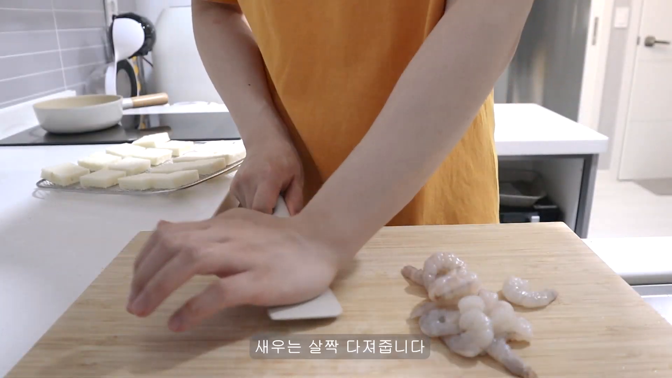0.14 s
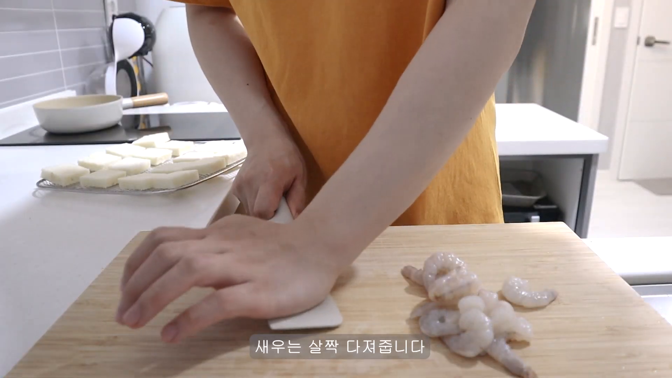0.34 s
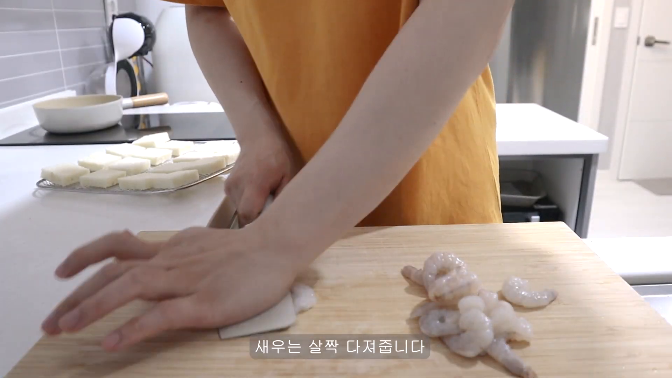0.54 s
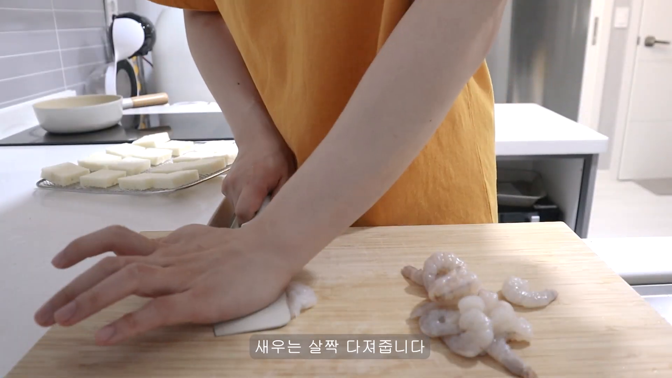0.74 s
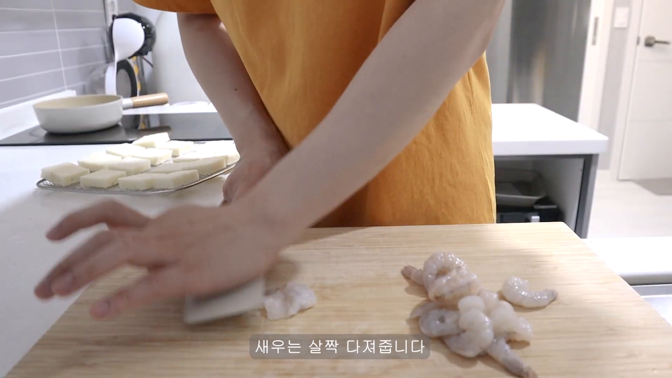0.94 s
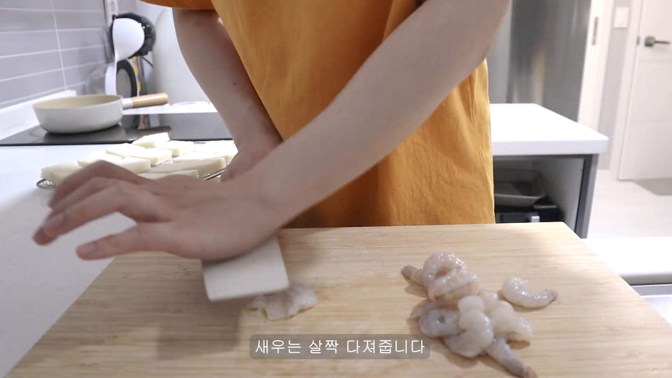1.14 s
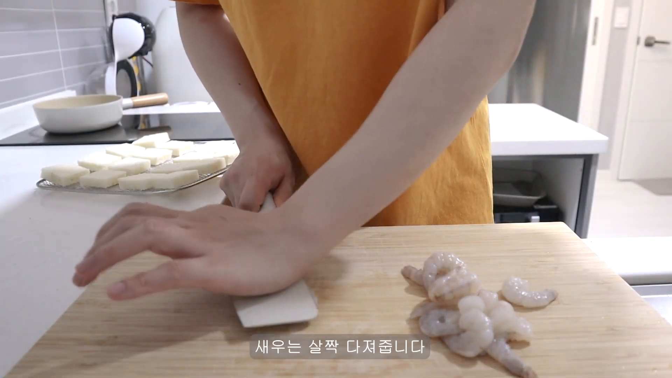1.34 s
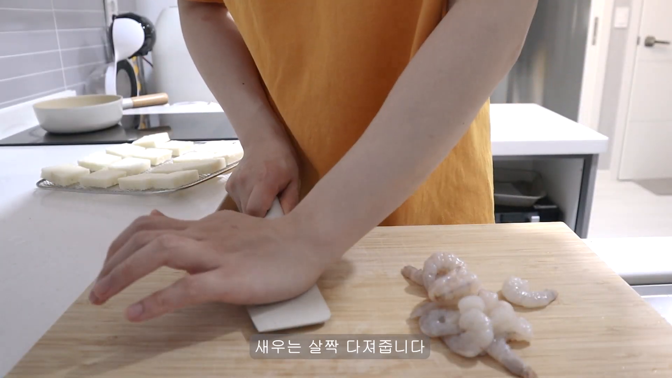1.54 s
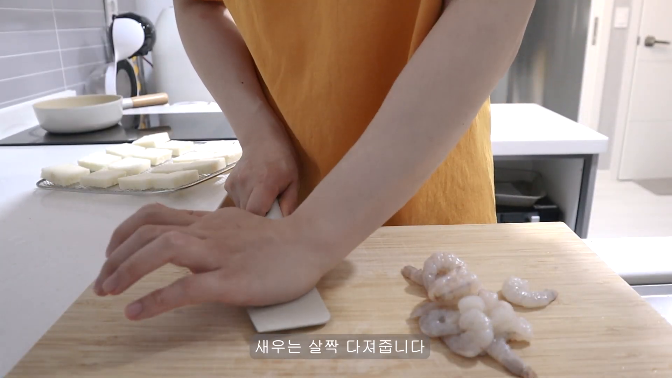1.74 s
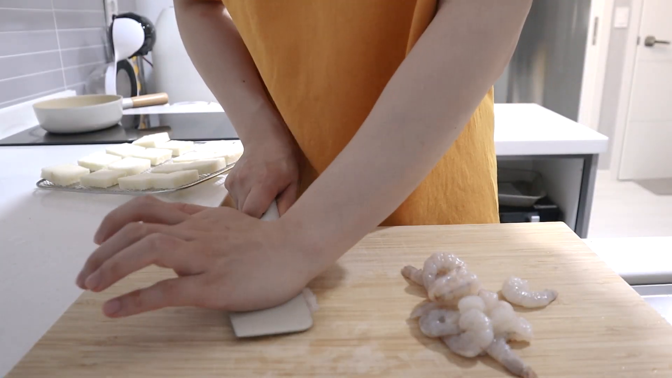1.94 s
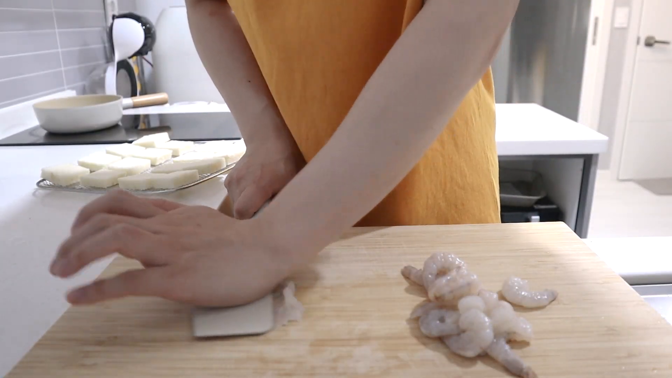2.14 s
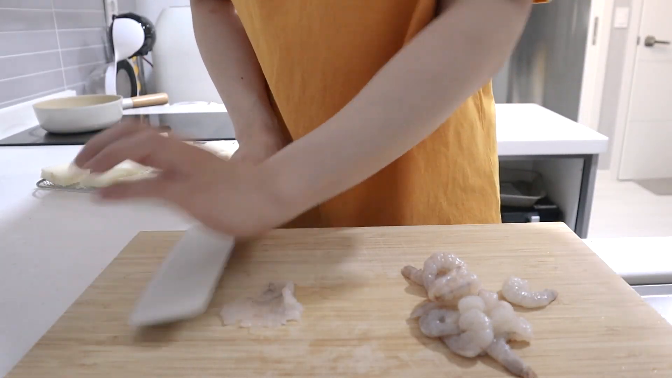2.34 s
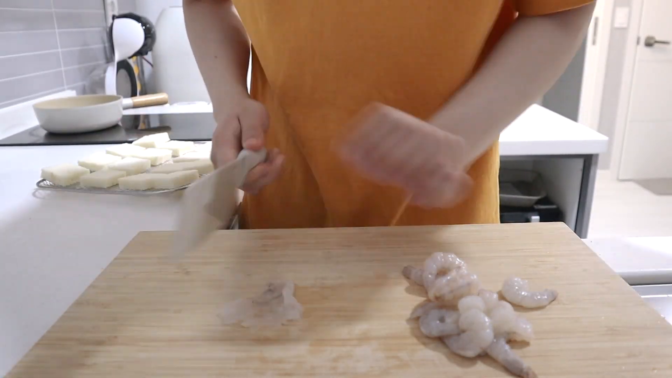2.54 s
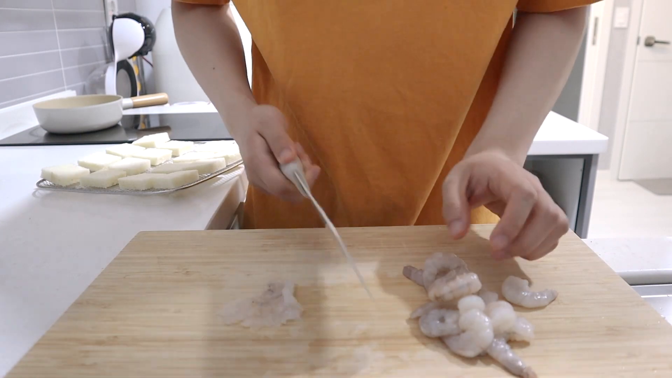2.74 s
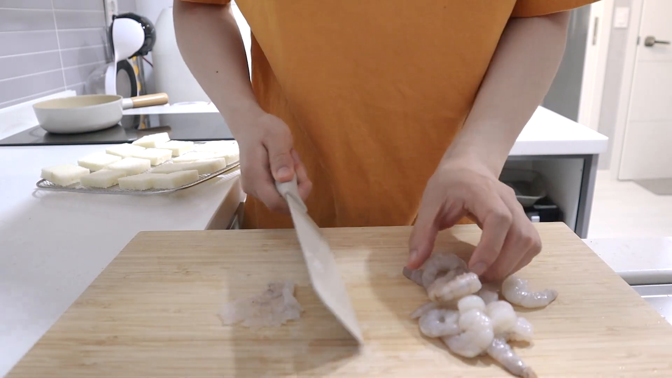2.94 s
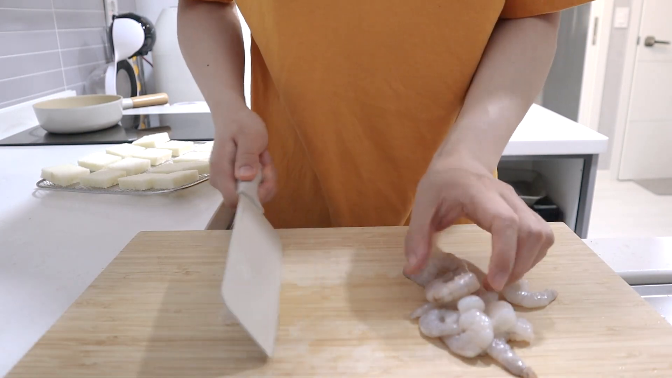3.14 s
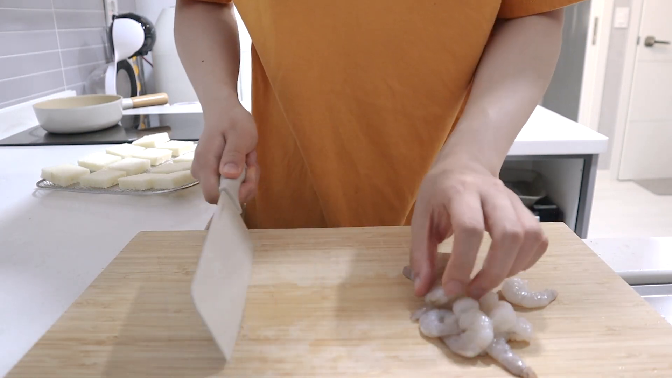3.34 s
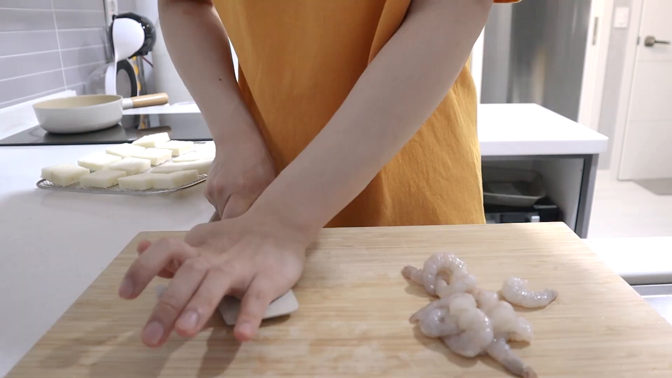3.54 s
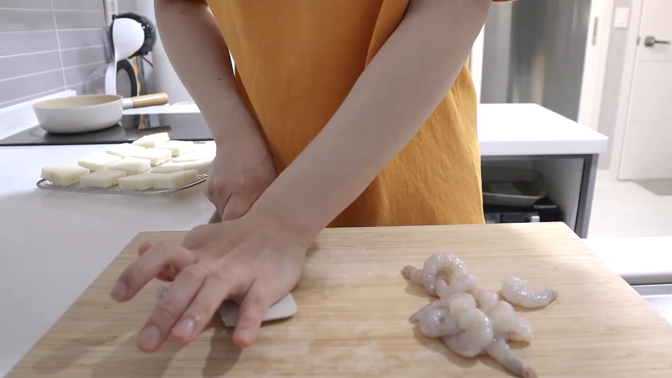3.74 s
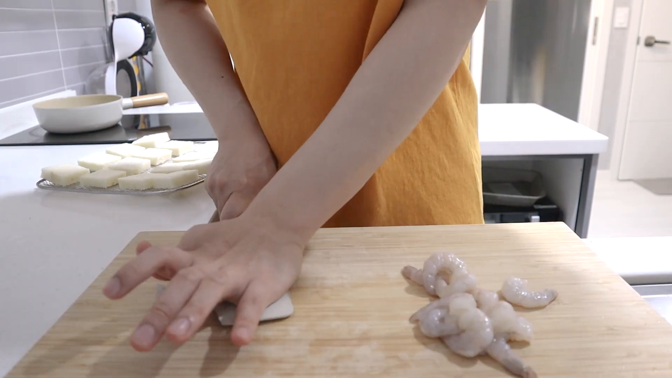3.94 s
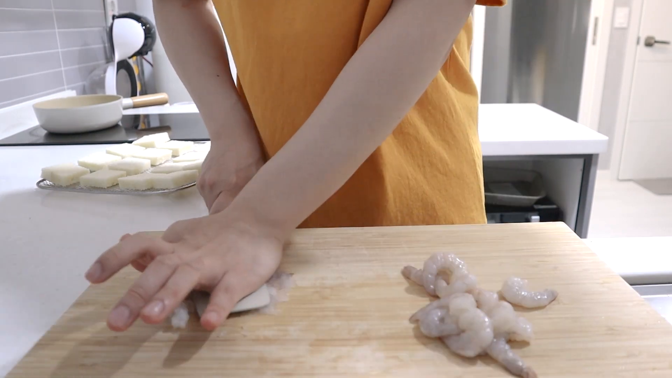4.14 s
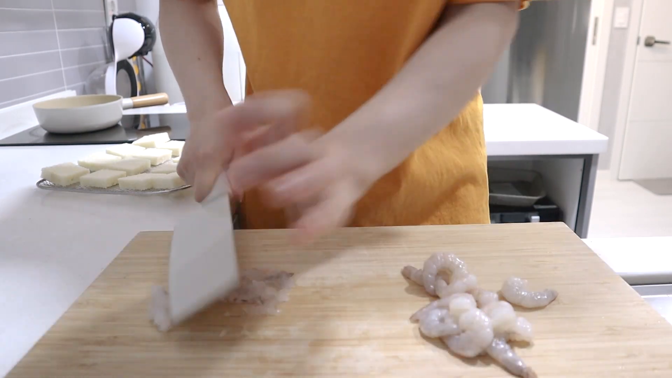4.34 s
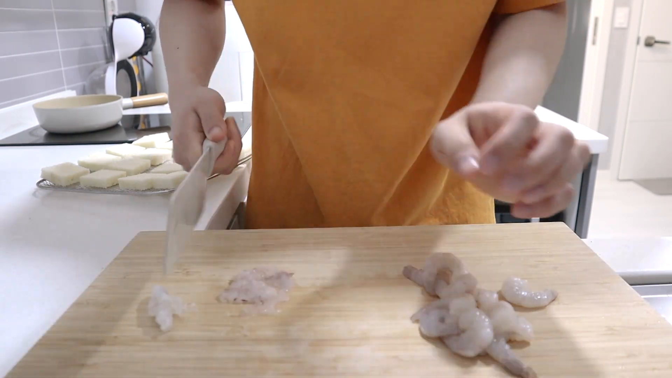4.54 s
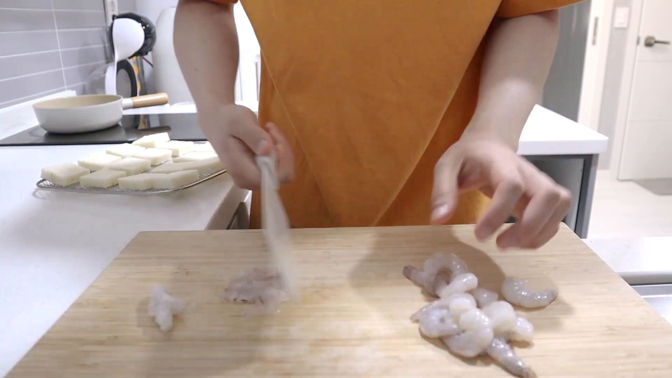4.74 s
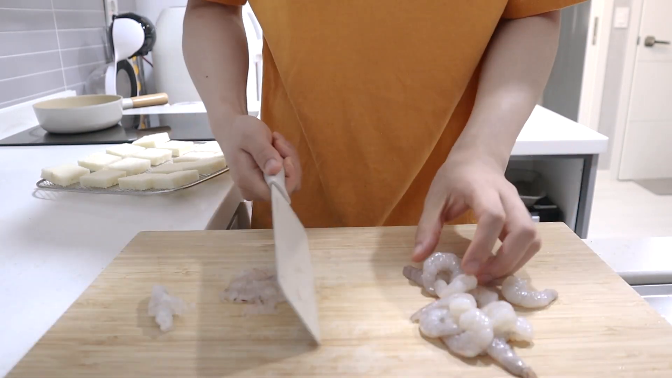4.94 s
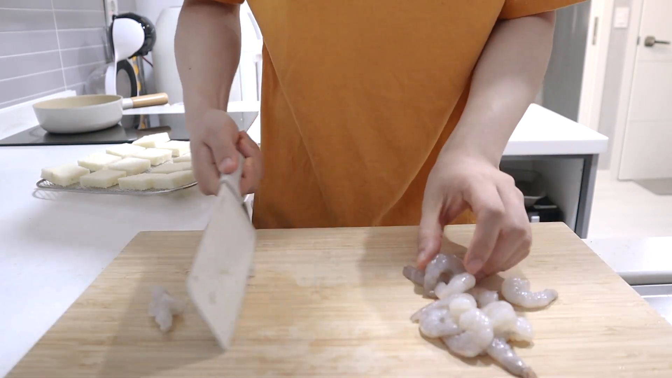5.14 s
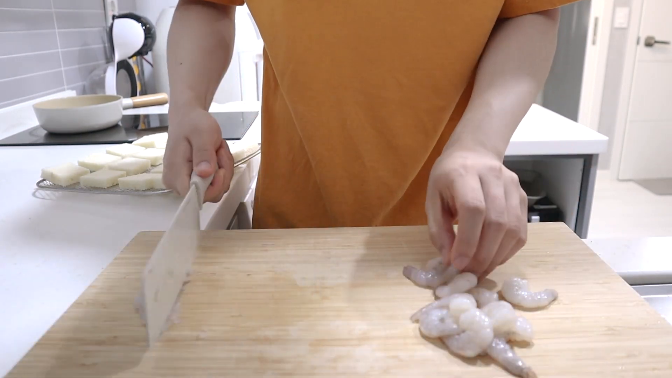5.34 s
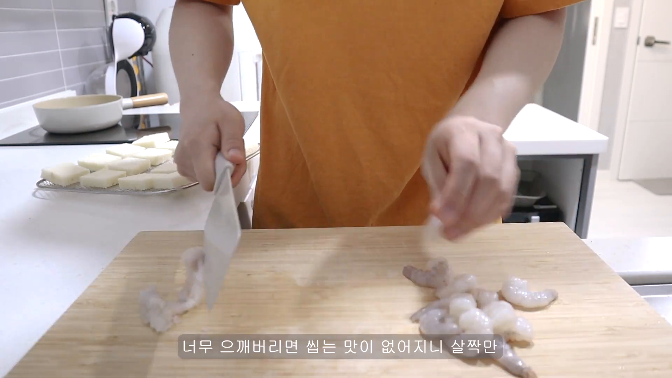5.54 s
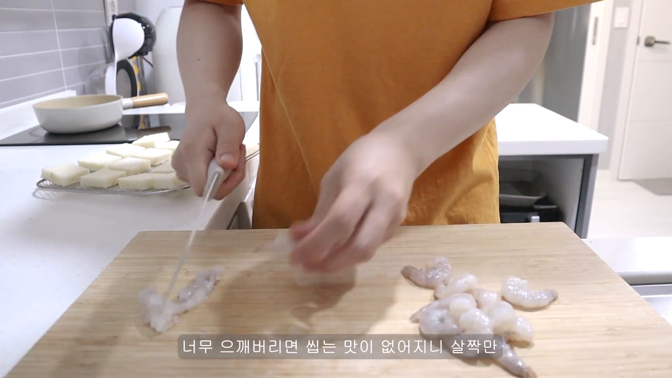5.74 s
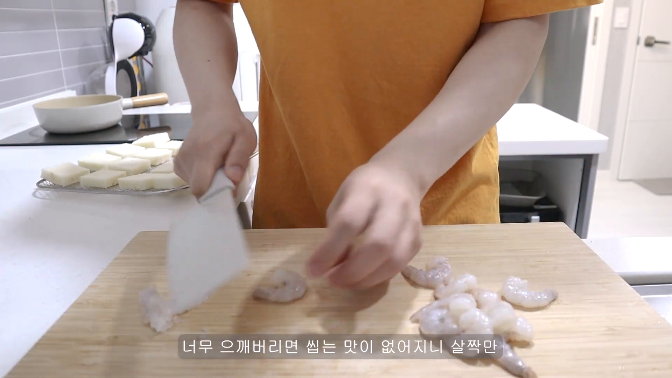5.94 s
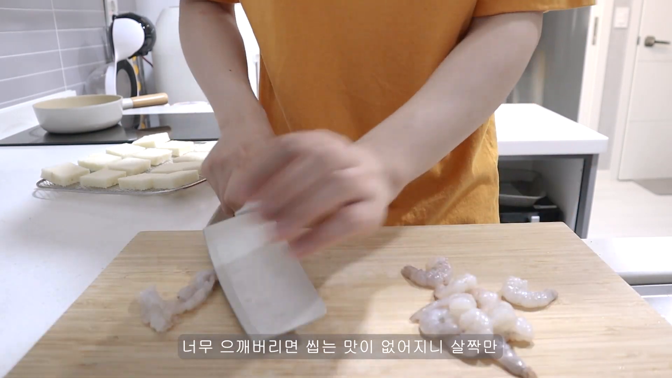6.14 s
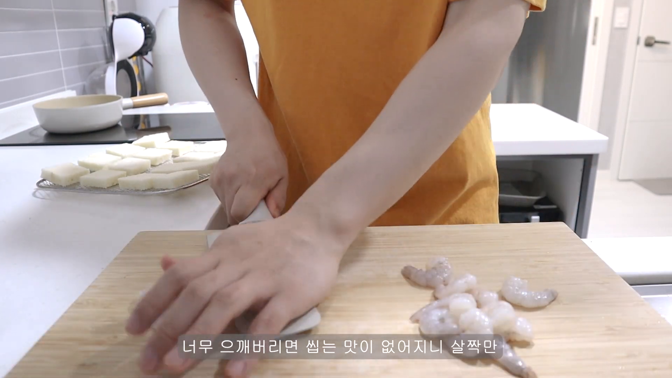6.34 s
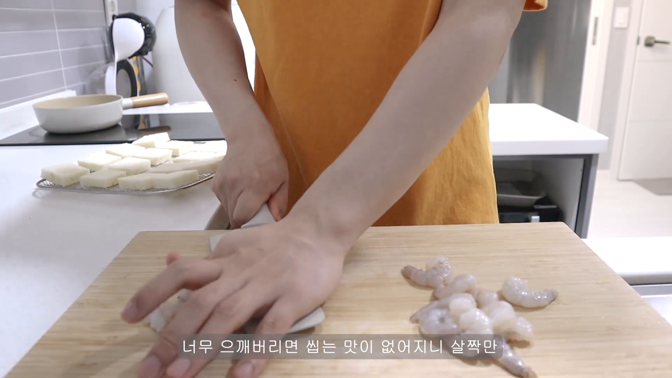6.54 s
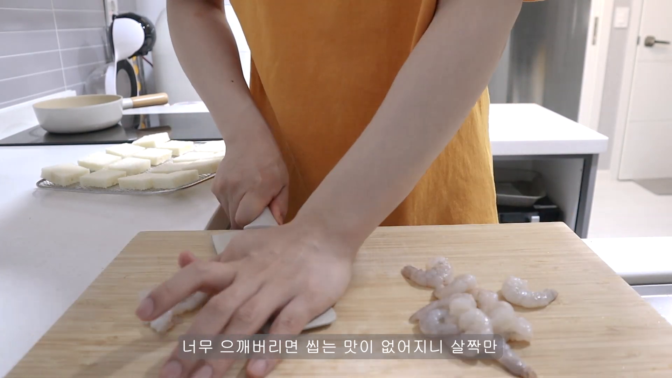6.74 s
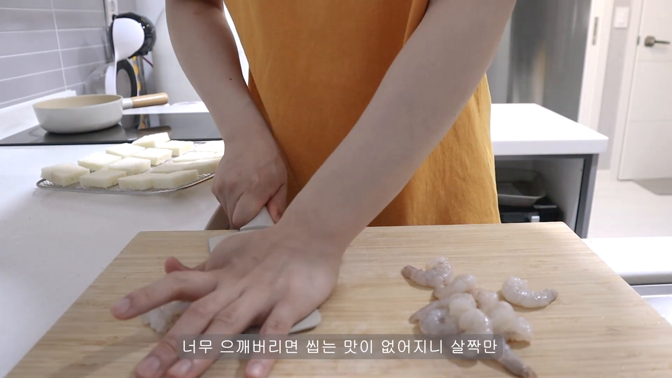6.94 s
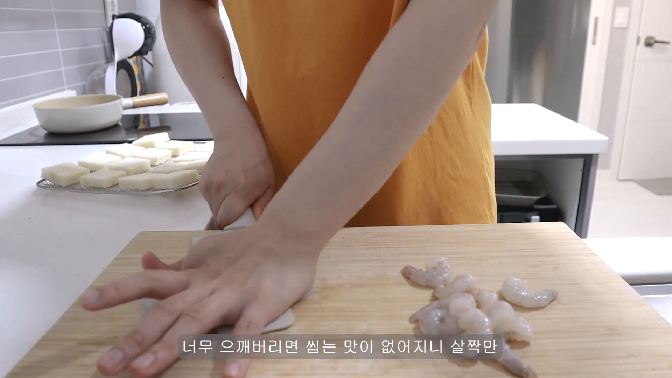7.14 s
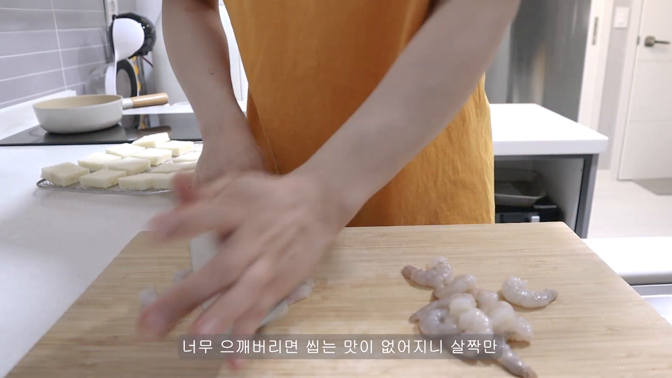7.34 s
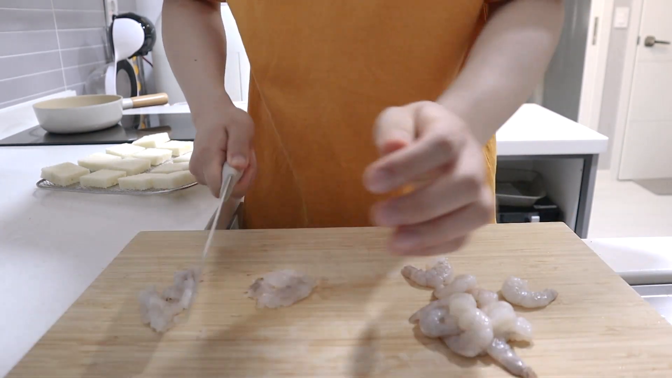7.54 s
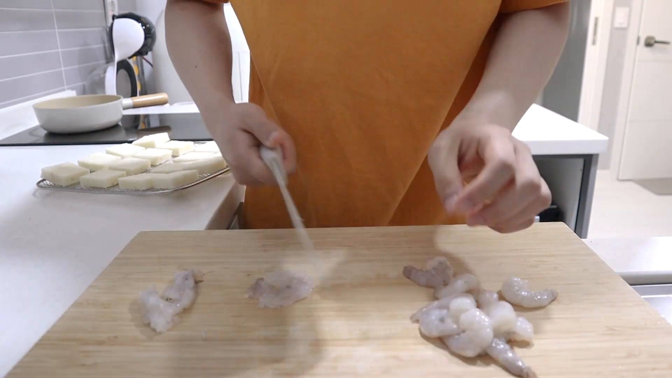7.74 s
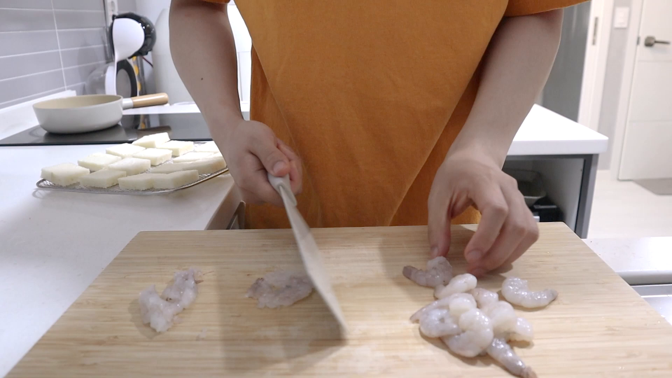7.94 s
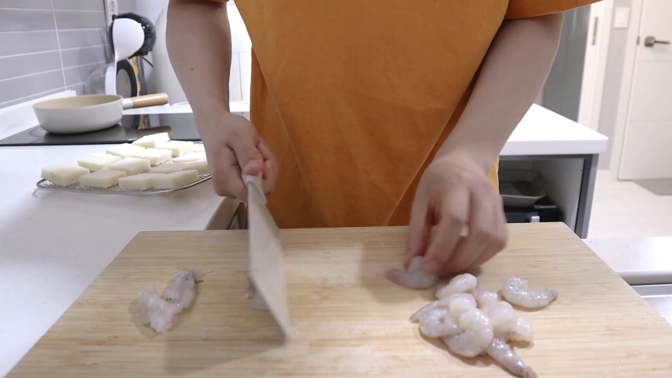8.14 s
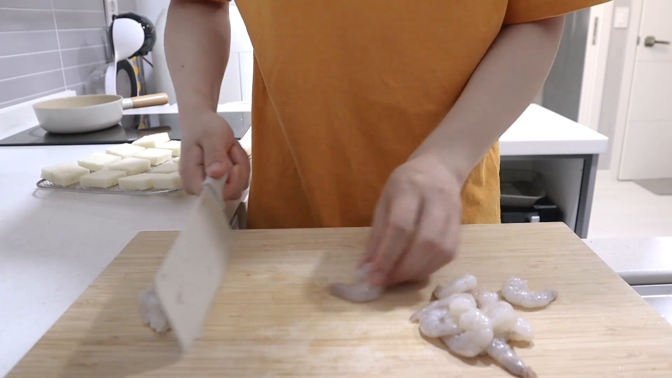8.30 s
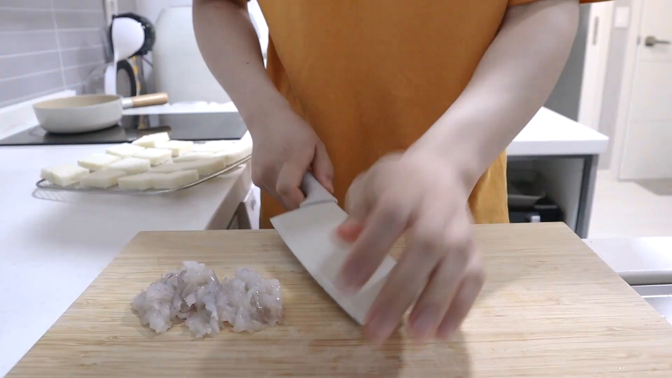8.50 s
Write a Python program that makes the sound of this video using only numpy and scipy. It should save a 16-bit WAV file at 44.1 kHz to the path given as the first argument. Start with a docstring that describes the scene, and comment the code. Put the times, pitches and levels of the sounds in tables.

```python
"""A steel cleaver, knocked down by a palm, crushes raw shrimp on a bamboo board in a small kitchen. Each knock
rings the board, and hard slaps also ring the blade; the crushed flesh squelches, fizzes and pops. Three times
the edge is scraped across the wood: a rain of tiny slips, coloured by blade and board. At 8.4 s all sound of
the work stops at once, in the middle of the last scrape; only the low hum of the room and one soft bump follow."""
import sys
import numpy as np
from scipy import signal
from scipy.fft import rfft, irfft, next_fast_len
from scipy.io import wavfile
from scipy.ndimage import uniform_filter1d

SR = 44100
rng = np.random.default_rng(int(sys.argv[2]) if len(sys.argv) > 2 else 0)


def dump(signal):
    """Clip the signal to [-1, 1] and save it as 16-bit WAV at the path in sys.argv[1]."""
    limited = np.clip(np.atleast_2d(signal).T, -1, 1)
    pcm = np.round(limited * 32767).astype(np.int16)
    wavfile.write(sys.argv[1], SR, pcm)


N = 382347
TIME = np.arange(N) / SR


def from_db(db):
    """Turn decibels into gain."""
    return 10 ** (np.asarray(db) / 20)


def at_hz(points, hz):
    """Read a table between its rows, on a log-frequency axis."""
    points = np.array(points)
    return np.interp(np.log(np.maximum(hz, 1)), np.log(points[:, 0]), points[:, 1])


def unit(x):
    """Scale a mid/side pair so that the mid has rms 1."""
    return x / np.sqrt(np.mean(x[0] ** 2) + 1e-20)


def band(x, low_hz, high_hz):
    """Keep only the sound between two frequencies."""
    sos = signal.butter(3, [low_hz, min(high_hz, 0.45 * SR)], "band", fs=SR, output="sos")
    return signal.sosfilt(sos, x)


def colour(x, spectrum, width, peaks=(), between_db=0, shared=0.26):
    """Give a mid/side pair a spectrum and a width; resonances stand out of the spectrum."""
    size = next_fast_len(x.shape[1])
    hz = np.arange(size // 2 + 1) * SR / size
    power = from_db(at_hz(spectrum, hz) + between_db) ** 2
    for centre, wide, db in peaks:
        wide = max(wide, centre / 130)
        power = power + from_db(db) ** 2 / (1 + ((hz - centre) / wide) ** 2) ** 2
    mid, side = rfft(x, size)
    # the shared part of the side lags the mid by about a quarter turn, wavering with frequency
    knots = np.linspace(0, SR / 2, 60)
    lag = np.interp(hz, knots, rng.normal(-np.pi / 2, 0.3, len(knots)))
    side = np.sqrt(shared) * np.exp(1j * lag) * mid + np.sqrt(1 - shared) * side
    side = side * from_db(at_hz(width, hz))
    coloured = irfft(np.array([mid, side]) * np.sqrt(power), size)
    return unit(coloured[:, :x.shape[1]])


def grains(per_s, spread_db):
    """Make random tiny slips of uneven size, as mid and side."""
    born = rng.random(N) < per_s / SR
    size_db = spread_db * np.minimum(rng.exponential(1, N), 4)
    return born * from_db(size_db) * rng.standard_normal((2, N))


def wander(x, depth_db, wide_hz, hold_s):
    """As the point of contact travels, resonances swell and fade at random."""
    hz, s, cells = signal.stft(x, SR, nperseg=512)
    field = rng.standard_normal(cells.shape[1:])
    for _ in range(2):
        field = uniform_filter1d(field, max(1, round(wide_hz / hz[1])), axis=0)
        field = uniform_filter1d(field, max(1, round(hold_s / s[1])), axis=1)
    moved = signal.istft(cells * from_db(depth_db * field / field.std()), SR)[1]
    return unit(moved[:, :N])


def fade(t, t60):
    """Die away exponentially, by 60 dB in t60 seconds."""
    return from_db(-60 * t / t60)


def add(out, start_s, sound):
    """Mix a sound in at its time."""
    i = int(start_s * SR)
    out[:, i:i + sound.shape[1]] += sound[:, :N - i]


# Tone of the still air. Each row: frequency in Hz, relative level in dB per Hz.
AIR = [(15, -57), (25, -9.5), (53, -2.5), (81, -6), (118, -1.5), (146, -14.5), (293, -16), (373, -15.5),
       (415, -18), (450, -19.5), (1390, -25.5), (4500, -34), (6370, -40.5), (12800, -46), (15000, -78.5)]
# Stereo width of the air. Each row: frequency in Hz, side over mid in dB.
AIR_WIDTH = [(60, -41.5), (180, -5.5), (550, 4), (1650, 4.5), (4970, 6), (15000, 6.5)]
# Steady hums of the room. Each row: frequency in Hz, width in Hz, level in dB.
HUM = [(118.5, 3.8, -74.5), (272.2, 9.7, -86), (355, 10, -89), (2685, 160, -87.5)]


def room_tone(air_db=-68.5):
    """Still air is rumbling noise; narrow bands of noise make the appliance hums."""
    air = from_db(air_db) * colour(rng.standard_normal((2, N)), AIR, AIR_WIDTH, shared=0)
    for hz, wide, db in HUM:
        noise = rng.standard_normal((2, N + SR))
        hum = unit(band(noise, hz - wide / 2, hz + wide / 2)[:, SR:])   # skip the filter's slow start
        air = air + from_db(db) * hum * from_db([[0], [at_hz(AIR_WIDTH, hz)]])
    return air


# How long the kitchen rings. Each row: frequency in Hz, time to fall by 60 dB in seconds.
ROOM_T60 = [(100, 0.65), (500, 0.43), (2000, 0.4), (6000, 0.33), (14000, 0.4)]


def kitchen(x, wet_db=-10.0, build_s=0.0015):
    """Tiles and cupboards return a short, diffuse tail whose bass lasts longest."""
    t, edges, tail = TIME[:SR // 2], np.geomspace(50, 16000, 9), 0
    for low, high in zip(edges, edges[1:]):
        noise = band(rng.standard_normal((2, len(t))), low, high)
        tail = tail + noise * fade(t, at_hz(ROOM_T60, np.sqrt(low * high)))
    tail = tail * (1 - np.exp(-(t / build_s) ** 2))
    tail = tail / np.sqrt(np.sum(tail[0] ** 2))
    return x + from_db(wet_db) * signal.fftconvolve(x, tail, axes=1)[:, :N]


# Soft pushes that rock the board. Each row: start in seconds, pitch in Hz, peak in dB, rise in seconds.
BUMPS = [(0.163, 197, -39, 0.013), (.984, 113, -40.5, 0.015), (1.682, 205, -54, 0.026),
         (6.755, 194, -48.5, 0.0094), (6.283, 58, -43.5, 0.018), (8.622, 86.5, -45, 0.0113)]


def bumps():
    """The weight of a hand rocks the board on the counter: a few slow swings, alike in both ears."""
    out, t = np.zeros((2, N)), TIME[:SR // 4]
    for s, hz, peak_db, rise_s in BUMPS:
        envelope = (t / rise_s) ** 2 * np.exp(2 - 2 * t / rise_s)
        swing = envelope * np.sin(2 * np.pi * hz * t)
        add(out, s, from_db(peak_db) * np.array([swing, 0 * swing]))
    return out


def catches(depth_db, slow_hz, fast_hz):
    """Make the gain of a contact that catches and lets go many times a second."""
    return from_db(depth_db * unit(band(rng.standard_normal((1, N)), slow_hz, fast_hz)))


# The edge dragged over the wood, one list of rows for each stroke.
# Each row: time in seconds, force as relative level of the rasp in dB, brightness in dB.
STROKES = [
    [(2.99, -68, -11), (3.04, -45, -14), (3.115, -39.5, -3), (3.19, -41.5, -3.5), (3.26, -66.5, -19),
     (3.33, -51, 2.5), (3.39, -53.5, -7.5), (3.515, -56, -1.5), (3.56, -87, 6)],
    [(4.98, -60.5, -30), (5.02, -48, -7), (5.1, -39.5, -7), (5.145, -52, -1.5), (5.19, -62, -19),
     (5.24, -80, 3)],
    [(7.95, -55, -29), (8.02, -45.5, -8), (8.095, -39, -8), (8.155, -51, -8), (8.19, -46, -10),
     (8.345, -43, -1.5), (8.39, -42.5, -3.5)],
]


def stroke_controls(edge_s):
    """Follow force and brightness of the strokes, and a gate that is open while the edge touches the wood."""
    times, forces, brights = np.vstack(STROKES).T
    force, bright = np.interp(TIME, times, forces), np.interp(TIME, times, brights)
    touching = 0
    for rows in STROKES:
        outside_s = np.maximum(rows[0][0] - TIME, TIME - rows[-1][0])
        touching = touching + np.clip(1 - outside_s / edge_s, 0, 1)
    return force, bright, touching


# Tone of rubbing on the board. Each row: frequency in Hz, relative level in dB per Hz.
SCRAPE_COLOUR = [(59, -35), (100, 0.5), (180, 2.5), (291, -3), (452, -1), (703, -11), (867, -4.5),
                 (1370, -4.5), (1530, -7.5), (3390, -16.5), (5480, -25.5), (7050, -28.5), (10500, -32.5),
                 (11400, -27.5), (15000, -55)]
# Stereo width of rubbing sounds. Each row: frequency in Hz, side over mid in dB.
RUB_WIDTH = [(60, -30), (150, -24), (380, -12.5), (950, -2.5), (2380, 2), (5980, 5.5), (15000, 5)]
# Resonances of the blade pressed on the board.
# Each row: frequency in Hz, width in Hz (widened if very narrow), relative level in dB.
BLADE = [(177, 9.2, 6), (482, 52, 1.5), (1100, 24, -9), (1368, 16, 3.5), (1630, 25, 1), (2054, 52, -9),
         (2330, 29, -8.5), (2693, 31, -4.5), (3000, 44, -7.5), (3258, 52, -6.5), (3830, 20, -9),
         (4220, 160, -19), (4540, 71, -15), (4760, 13, -14), (5970, 250, -22), (6350, 66, -20),
         (6920, 150, -16), (7340, 82, -17), (9000, 38, -17.5), (8670, 67, -33.5), (9800, 23, -15),
         (11050, 82, -13.5), (12370, 33, -21), (12930, 45, -21.5)]


def scrapes(rumble_db=-7.5, rasp_db=-1.5, rumble_follows=0.92, rumble_thins=0.15, usual_force_db=-45):
    """The edge catches on the grain thousands of times a second; a bright stroke rumbles less."""
    slips = colour(grains(per_s=5000, spread_db=0.6), SCRAPE_COLOUR, RUB_WIDTH, BLADE, between_db=0.5)
    slips = wander(slips, depth_db=2.5, wide_hz=260, hold_s=0.05)
    slips = slips * catches(depth_db=0.5, slow_hz=29.0, fast_hz=204)
    low, middle, high = (unit(band(slips, *edges)) for edges in [(120, 650), (650, 2200), (2200, 16000)])
    force, bright, touching = stroke_controls(edge_s=0.011)
    rumble = usual_force_db + rumble_follows * (force - usual_force_db) - rumble_thins * bright
    rub = from_db(rumble_db + rumble) * low
    rub = rub + from_db(rasp_db + force) * middle
    rub = rub + from_db(force + bright) * high
    return touching * rub


# The loaded blade groans briefly at one pitch.
# Each row: start in seconds, length in seconds, first pitch in Hz, last pitch in Hz, level in dB.
JUDDERS = [(2.925, 0.062, 961, 863, -55), (3.1, 0.11, 180, 153, -64), (4.936, 0.081, 951, 897, -46),
           (5.077, 0.053, 1359, 1339, -46.5), (5.07, 0.12, 197.2, 150.4, -55), (7.956, 0.05, 926, 845, -45),
           (7.998, 0.089, 365.7, 483, -44), (8.379, 0.038, 1597, 1740, -47)]


def judders(wobble=0.024, rough=0.4):
    """For a moment the slips lock to one resonance, whose pitch slides with the pressure."""
    out = np.zeros((2, N))
    for s, length, first_hz, last_hz, db in JUDDERS:
        n = int(length * SR)
        pitch_waver, level_waver = unit(band(rng.standard_normal((2, SR // 2)), 20, 150))[:, -n:]
        pitch_hz = np.linspace(first_hz, last_hz, n) * (1 + wobble * pitch_waver)
        phase = 2 * np.pi * np.cumsum(pitch_hz) / SR
        tone = np.array([np.sin(phase), -from_db(at_hz(RUB_WIDTH, first_hz)) * np.cos(phase)])
        envelope = signal.windows.tukey(n, 0.5) * (1 + rough * level_waver)
        add(out, s, from_db(db) * np.sqrt(2) * envelope * tone)
    return out


def swell(start_s, length_s, peak_share=0.3, arch=0.76):
    """A push of the hand builds up and lets go in one arch; a lower arch number makes it rounder."""
    peak_s = start_s + length_s * peak_share
    angle = np.interp(TIME, [start_s, peak_s, start_s + length_s], [0, np.pi / 2, 0])
    return np.sin(angle) ** arch


# The palm bears down and flesh spreads under the blade.
# Each row: start in seconds, length in seconds, relative level in dB, weight as extra rumble in dB.
PRESSES = [(0.159, 0.096, -62.5, 4), (0.301, 0.15, -59, 8.5), (0.476, 0.22, -61, 9.5), (.94, 0.094, -75, 6),
           (1.832, 0.34, -63.5, 8.5), (2.16, 0.17, -69.5, -2), (3.532, 0.45, -68.5, 5),
           (3.995, 0.19, -69.5, 1.5), (4.18, 0.26, -75.5, 4), (5.841, 0.17, -77, 9.5),
           (6.692, .23, -60.5, 8), (6.964, 0.15, -64.5, 2.5), (7.101, 0.11, -60.5, 2),
           (7.284, 0.12, -68, 4.5)]
# The blade glides on the wet film. Each row: start in seconds, length in seconds, fizz level in dB.
GLIDES = [(.94, 0.27, -73.5), (1.207, .21, -75.5), (2.29, 0.074, -82), (4.17, 0.27, -80), (5.29, .1, -78.5)]


def squelches(rumble_db=-6.5, usual_fizz_db=-81.5, usual_press_db=-63, fizz_follows=0.79):
    """Crushed flesh gives way in wet crackles; the film of juice fizzes as the steel slides over it."""
    tears = grains(per_s=560, spread_db=1.7) + from_db(-11.0) * grains(per_s=6000, spread_db=1.5)
    crackle = wander(colour(tears, SCRAPE_COLOUR, RUB_WIDTH), depth_db=3.0, wide_hz=450, hold_s=0.02)
    film = colour(grains(per_s=12000, spread_db=-1.5), SCRAPE_COLOUR, RUB_WIDTH)
    squelch = rumble = fizz = 0
    for s, length, db, weight_db in PRESSES:
        push = swell(s, length)
        squelch = squelch + from_db(db) * push
        rumble = rumble + from_db(rumble_db + db + weight_db) * push
        # the fizz follows only part of the strength of the press
        fizz = fizz + from_db(usual_fizz_db + fizz_follows * (db - usual_press_db)) * push
    for s, length, db in GLIDES:
        fizz = fizz + from_db(db) * swell(s, length)
    return (rumble * unit(band(crackle, 90, 520))
            + squelch * unit(band(crackle, 1010, 7000))
            + fizz * unit(band(film, 7000, 14000)))


def small_pops(count, strongest_db=0.5, range_db=16.5, bright_db=1):
    """Every press bursts a few more pockets at chance moments, listed like the rows of POPS."""
    rows = []
    for s, length, press_db, _ in PRESSES:
        for _ in range(count):
            pop_db = press_db + strongest_db - range_db * rng.random()
            rows.append((s + length * rng.beta(2, 2), pop_db, bright_db))
    return rows


# The clearest wet pops of bursting and unsticking flesh.
# Each row: start in seconds, relative level in dB, brightness in dB.
POPS = [(.322, -77.5, 19), (.341, -69, -20), (.383, -72, 4), (.492, -61, -4), (.532, -72, -11),
        (.674, -55.5, -4), (.932, -72, -1), (.957, -68, 8.5), (1.628, -72, 10), (1.709, -68, 5.5),
        (1.828, -61.5, -12), (1.844, -58, -8.5), (1.888, -57.5, -6.5), (1.92, -55.5, -6),
        (1.958, -60, -1.5), (2.08, -67, 7.5), (2.178, -77, 6.5), (2.347, -80.5, 19.5), (2.359, -79, 19.5),
        (2.682, -72.5, 1.5), (3.597, -66, -4), (3.629, -59, 1), (3.67, -65, -2), (3.693, -63, -1),
        (3.794, -61.5, -2), (4.105, -68.5, 8), (4.286, -61.5, 5), (5.364, -67, 0), (5.865, -75.5, -14),
        (6.579, -74.5, 3.5), (6.616, -65.5, -8), (6.701, -63.5, -4.5), (6.729, -69, -5), (6.758, -56, -13),
        (6.845, -62, -11), (6.871, -63, -9.5), (6.937, -49.5, -7), (6.963, -52.5, 4), (7.101, -67, -7),
        (7.136, -64.5, -17.5), (7.368, -62.5, -5)]
# The registers of a pop, from low to high. Each row: lowest Hz, highest Hz,
# time to fall by 60 dB in seconds, relative level in dB, share of the brightness it takes.
POP_REGISTERS = [(642, 2260, 0.1, -1.5, -0.55), (2090, 4470, 0.094, 3, -0.094),
                 (4700, 10170, 0.074, -1, 0.85), (9500, 15200, 0.069, -8.5, 1.3)]


def pops(burst_db=-1.5, burst_s=0.00062):
    """A pocket of juice bursts with a sharp snap and a short spray of clicks, the highest gone first."""
    out, t = np.zeros((2, N)), TIME[:SR // 10]
    attack = int(0.012 * SR)   # each register is levelled over this first moment
    spray = colour(grains(per_s=11000, spread_db=-1.0), SCRAPE_COLOUR, RUB_WIDTH)
    spray = wander(spray, depth_db=4.0, wide_hz=500, hold_s=0.03)
    snap = 1 + from_db(burst_db) * np.exp(-t / burst_s)
    for s, pop_db, bright_db in list(POPS) + small_pops(count=2):
        burst = spray[:, int(s * SR):][:, :len(t)] * snap
        for low, high, t60, db, by_brightness in POP_REGISTERS:
            part = band(burst * fade(t, t60), low, high)
            gain = from_db(pop_db + db + by_brightness * bright_db)
            add(out, s, gain * part / np.std(part[0, :attack]))
    return out


# The flat of the blade slaps down and rings on. Each row: start in seconds, relative level in dB.
SLAPS = [(0.273, -67), (.566, -66), (0.983, -58.5), (2.381, -54), (6.285, -39.5)]
# Ringing tones of the loosely held steel blade.
# Each row: frequency in Hz, relative level in dB, time to fall by 60 dB in seconds before the grip's limit.
STEEL = [(481, -6, 0.22), (940, -4.5, 0.13), (1484, -15, 0.53), (2160, -24, 0.41), (2372, -11, 0.17),
         (2770, -5.5, 0.083), (3350, -15, 0.19)]
# Stereo width of blows and slaps. Each row: frequency in Hz, side over mid in dB.
BLOW_WIDTH = [(60, -50), (150, -24), (380, -12), (950, -5.5), (2380, 0.5), (5980, 6), (15000, 3)]


def slaps(grip_t60=0.3):
    """Struck on its flat, the thin steel rings on; the grip limits how long each tone lasts."""
    out, t = np.zeros((2, N)), TIME[:SR // 3]
    hz, mode_db, t60 = np.transpose(STEEL)[:, :, None]
    for s, db in SLAPS:
        phase = 2 * np.pi * hz * t + np.pi * rng.integers(0, 2, (len(hz), 1))
        swing = np.array([np.sin(phase), -from_db(at_hz(BLOW_WIDTH, hz)) * np.cos(phase)])
        ring = from_db(db + mode_db) * fade(t, np.minimum(t60, grip_t60)) * swing
        add(out, s, ring.sum(axis=1))
    return out


# Blade or palm knocking on the board. Each row: start in seconds, relative level in dB,
# weight as extra bass in dB, hardness as extra treble in dB.
BLOWS = [(0.158, -43, -8, -12.5), (0.274, -47.5, -2, -10), (0.5647, -44.5, -9, 0.5), (0.614, -54.5, 3, 2),
         (0.733, -51, -1, -12.5), (0.986, -63.5, 11.5, -5), (1.679, -60, 3, -18), (2.381, -62.5, 2, 3.5),
         (2.907, -38, -1.5, -13.5), (4.322, -66.5, 0.5, -10), (4.9079, -37, -5.5, -16),
         (6.285, -51.5, -1.5, -4), (6.313, -61, 4, -9), (6.925, -57.5, 5, 3.5), (7.906, -36, -7.5, -14.5)]
# The registers of a blow, from low to high. Each row: lowest Hz, highest Hz, time in seconds for
# its crowded modes to fall by 60 dB, relative level in dB, share of the weight, share of the hardness.
REGISTERS = [(54.6, 300, 0.21, 0.5, 1, -0.015), (260, 607, .18, -3, 0.71, -0.43),
             (590, 1254, 0.056, -1, 0.069, -0.22), (1250, 2010, 0.087, 2, 0.048, 0.4),
             (2270, 4660, .041, 1.5, 0, 1), (4400, 15600, 0.026, -9.5, 0.54, 0.6)]
# Ringing tones of the board lying on the counter.
# Each row: frequency in Hz, relative level in dB, time to fall by 60 dB in seconds.
BOARD = [(61, -18.5, 0.047), (104.4, -13, 0.41), (174.1, -3.5, 0.27), (291.2, -3.5, 0.24), (366, 0.5, 0.2),
         (478, -7.5, 0.2), (562, 0, 0.13), (694, -38, 0.063), (814, -0.5, 0.11), (898, -6.5, 0.095),
         (1042, 8, 0.031), (1366, -3.5, 0.08), (1673, -7, 0.12), (2046, -12.5, 0.05), (2156, -10, 0.12),
         (2677, -2, 0.04), (3120, -9.5, 0.037)]
# Tone of the crowd of short modes. Each row: frequency in Hz, relative level in dB per Hz.
BLOW_COLOUR = [(24, -33), (40, -8), (91, 3), (216, -17), (364, -3.5), (659, -11.5), (1060, 1.5),
               (1140, -10.5), (2850, -12.5), (3300, -2.5), (4910, -24), (11400, -38.5), (15000, -55)]


def blows(crowd_db=3.5, crack_db=-1.0, crack_s=0.0031, rise_s=0.0004, uneven_db=-0.54, level_db=1.0):
    """Each knock rings the board's modes and a crowd of short ones, loudest while the steel is in contact."""
    out, t = np.zeros((2, N)), TIME[:SR // 3]
    hz, mode_db, t60 = np.transpose(BOARD)[:, :, None]
    attack = int(0.03 * SR)   # each register is levelled over this first moment
    contact = (1 - np.exp(-t / rise_s)) * (1 + from_db(crack_db) * np.exp(-t / crack_s))
    for s, blow_db, weight_db, hard_db in BLOWS:
        strength = from_db(mode_db + uneven_db * rng.standard_normal((2, len(hz), 1)))
        strength = strength * rng.choice([-1, 1], (2, len(hz), 1))
        strength[1] *= from_db(at_hz(BLOW_WIDTH, hz))
        modes = (strength * np.sin(2 * np.pi * hz * t) * fade(t, t60)).sum(axis=1)
        crowd = 2 * from_db(crowd_db) * colour(rng.standard_normal((2, len(t))), BLOW_COLOUR, BLOW_WIDTH)
        for low, high, dies, db, by_weight, by_hardness in REGISTERS:
            part = band((modes + crowd * fade(t, dies)) * contact, low, high)
            gain = from_db(level_db + blow_db + db + by_weight * weight_db + by_hardness * hard_db)
            add(out, s, gain * part / np.std(part[0, :attack]))
    return out


def scene(break_s=8.396):
    """The work on the board sounds in the kitchen until it breaks off; mid and side become left and right."""
    work = kitchen(blows() + slaps() + scrapes() + judders() + squelches() + pops())
    work = work * fade(np.clip(TIME - break_s, 0, 0.1), 0.018)
    mid, side = work + bumps() + room_tone()
    return np.array([mid + side, mid - side])


def record(dry, ceiling=0.56, stop_hz=15300):
    """The hardest peaks are rounded and the top is cut steeply."""
    dry = ceiling * np.tanh(dry / ceiling)
    return signal.sosfilt(signal.cheby2(12, 60, stop_hz, fs=SR, output="sos"), dry)


dry = scene()
out = record(dry)
dump(out)
```